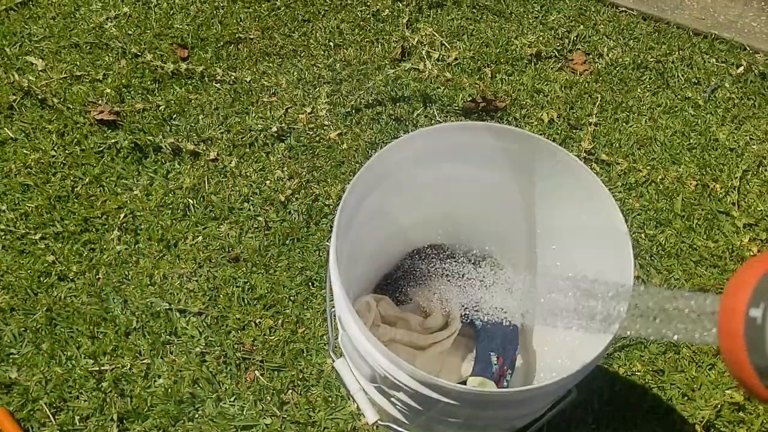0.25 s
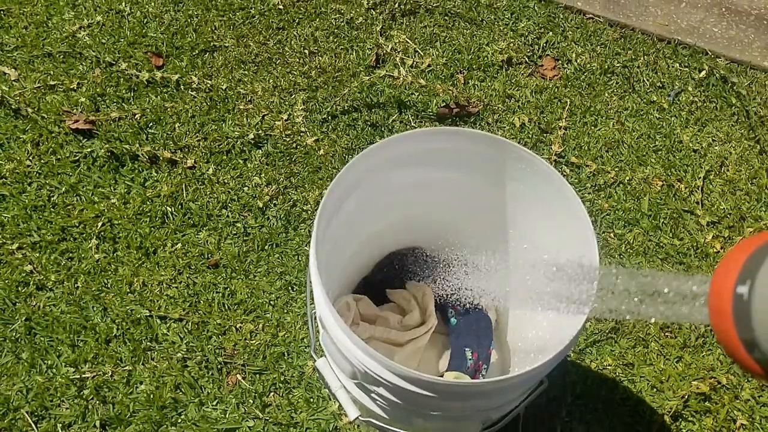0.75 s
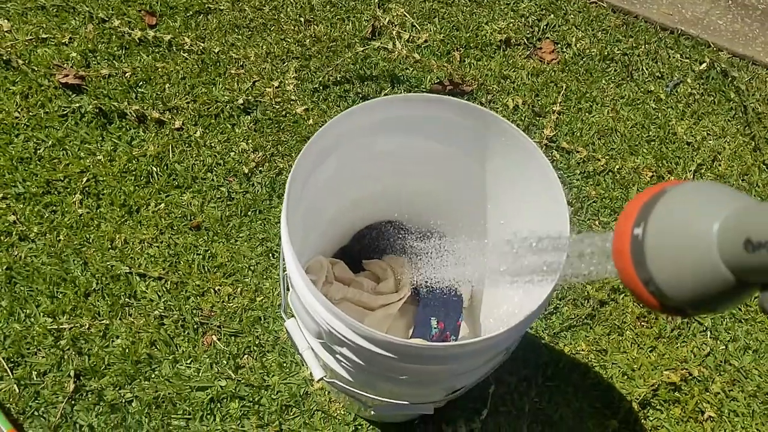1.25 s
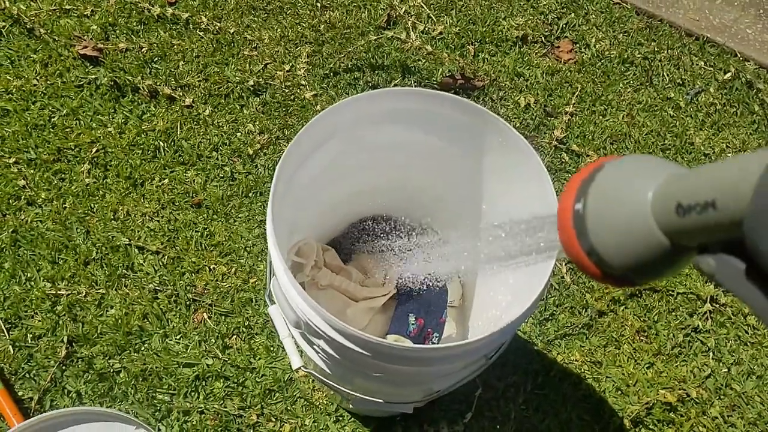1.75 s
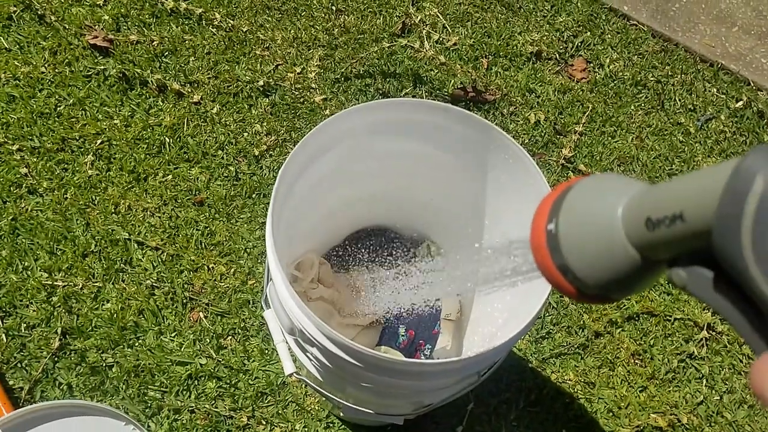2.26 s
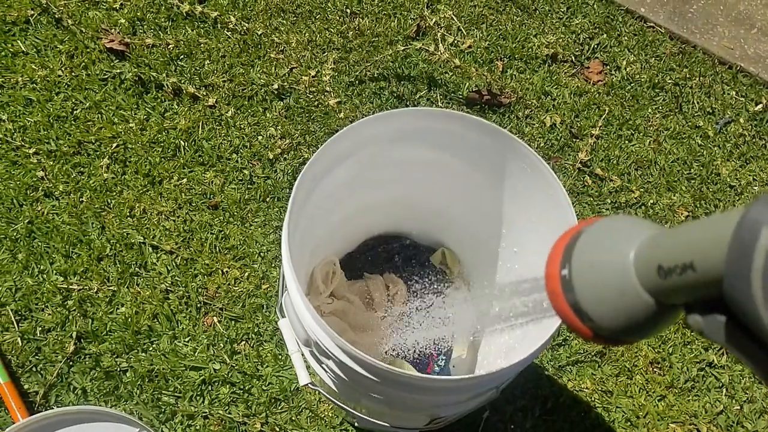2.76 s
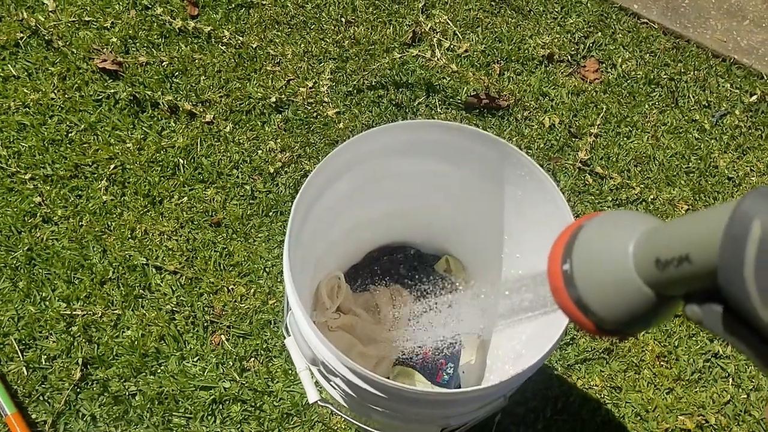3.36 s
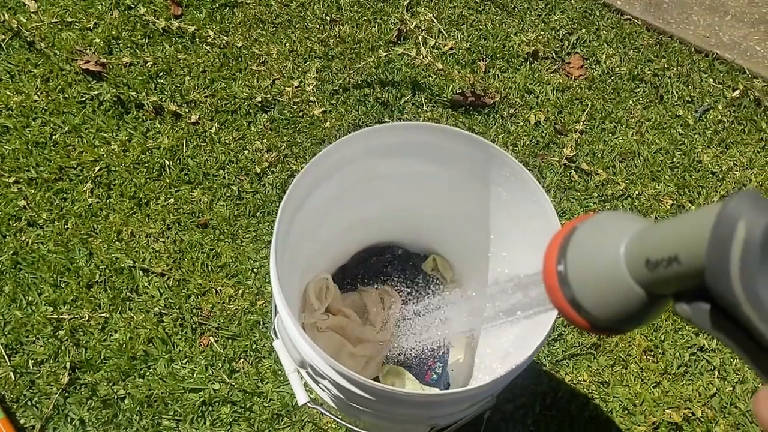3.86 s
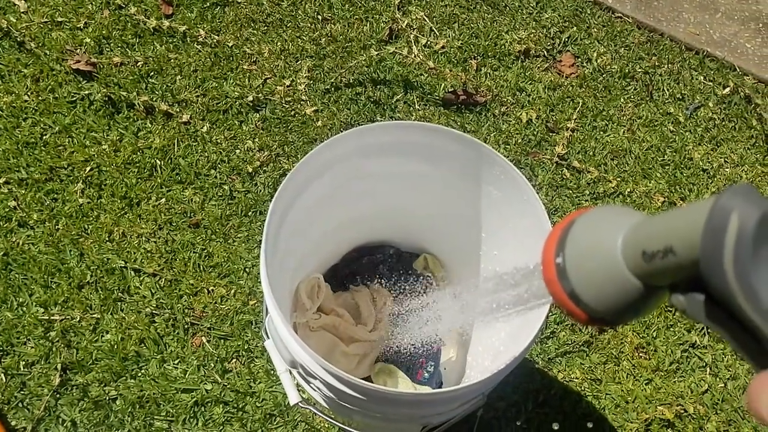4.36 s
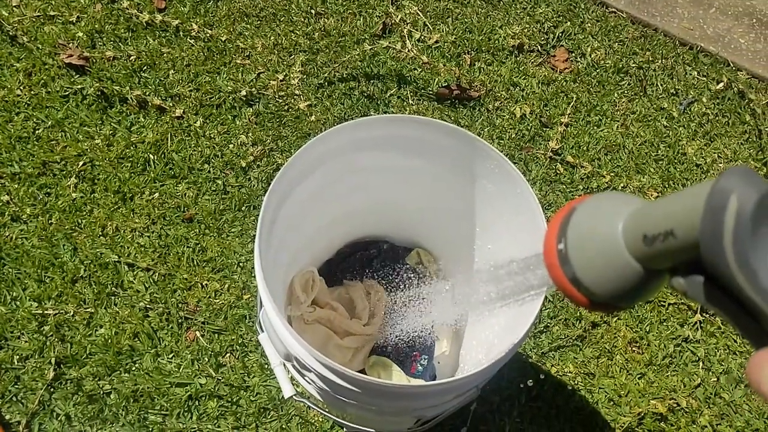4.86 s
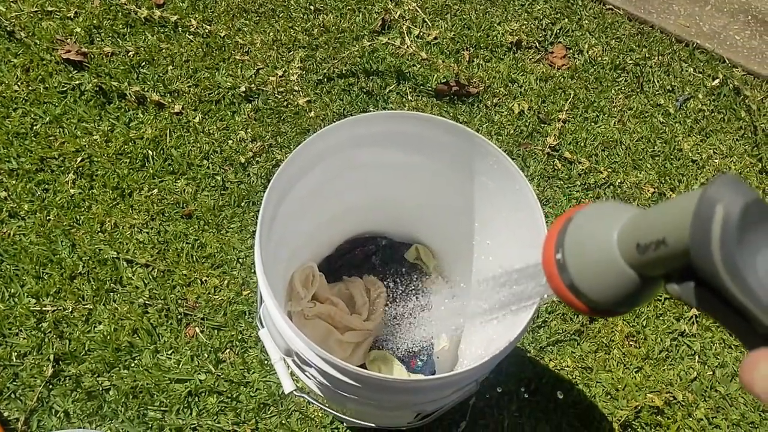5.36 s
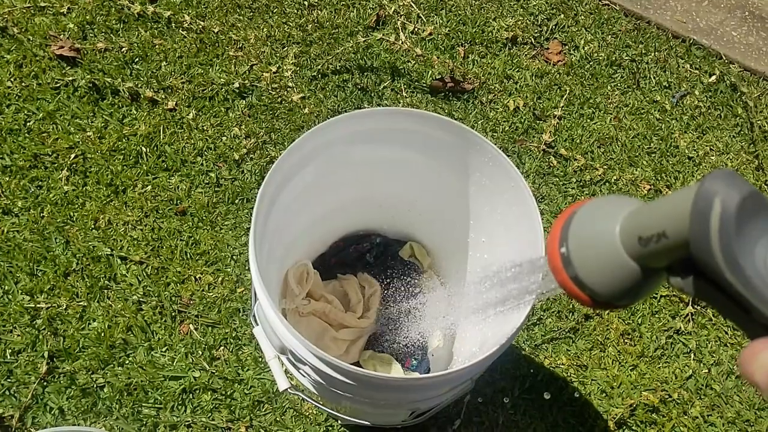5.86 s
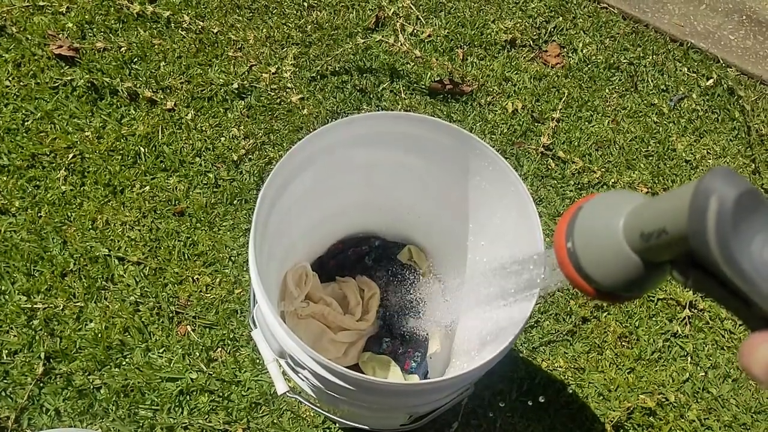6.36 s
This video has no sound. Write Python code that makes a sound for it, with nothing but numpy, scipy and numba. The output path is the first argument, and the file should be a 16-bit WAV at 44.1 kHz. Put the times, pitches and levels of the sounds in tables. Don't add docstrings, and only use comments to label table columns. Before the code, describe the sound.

Outdoors, close to a small stereo camera, a hose shower head sprays into a plastic bucket holding wet laundry. From 0 s the spray is thin and fluttering, dipping and pulsing as it is aimed, with hard bright clicks of big drops and low puffs of wind on the microphone. By about 1 s it swells into a dense, crisp hiss, strongest around 1.3 s, with splats on soaked cloth and a few small plops near 1.6 s. Underneath, the bucket drums and rings hollowly, its tone shifting as jets and water move. Around 2.3 s the spray weakens, then recovers and flows fairly steadily from 3 s, with scattered cracks and an odd plop. It strengthens again after 6 s, with more splats, and is still running at 6.6 s. The water leans right; a faint low engine drone swells near 1.7 s and gradually fades.

```python
import sys
import numpy as np
from scipy import signal
from scipy.fft import rfft, irfft, next_fast_len
from scipy.io import wavfile
from scipy.ndimage import uniform_filter1d, map_coordinates
from numba import njit

SR = 44100
rng = np.random.default_rng(int(sys.argv[2]) if len(sys.argv) > 2 else 0)


def nominal_scale(level):
    x = np.asarray(level, float) / 20
    return 10 ** x


def transcribe(signal):
    frames = np.atleast_2d(signal).T
    limited = np.clip(frames, -1, 1)
    pcm = np.round(limited * 32767).astype(np.int16)
    wavfile.write(sys.argv[1], SR, pcm)


N = 291942

# [t/s, right peak level/dB, f/Hz]
CRACKS = [(0.0153, -9.5, 7600), (0.1841, -5, 8500), (0.2005, -4, 7900), (0.2378, -7, 7600),
          (0.2866, -5, 8010), (0.4378, -3, 7640), (0.5627, -5, 7300), (0.6927, 0.5, 8350),
          (0.7234, -1, 7400), (0.9747, -1.2, 7600), (0.9867, 6, 7900), (1.0196, -3, 7600),
          (1.1425, 1, 7400), (1.1649, -0.6, 7600), (1.4017, 1.2, 7850), (1.5731, 1, 7800),
          (1.8711, -2.5, 8180), (1.8979, 2, 7550), (2.1001, 0, 8560), (2.5636, -1.5, 8500),
          (2.6076, -6, 8100), (2.9948, -1, 8080), (3.3454, -4.5, 8500), (4.4155, 2, 8500),
          (4.6141, -11, 7800), (4.7753, 2, 8450), (4.8544, 2, 8400), (5.7129, 3, 8440), (6.5859, -8, 8030),
          (6.6124, -3, 8300)]
# [t/s, right peak level/dB, f/Hz]
SPLATS = [(0.1578, -29, 2720), (0.4066, -20, 3300), (0.6042, -18, 2540), (0.6978, -22, 3370),
          (0.8398, -11, 3280), (0.9459, -8.5, 3320), (1.1426, -3.5, 2880), (1.2441, -3, 3340),
          (1.4132, -18, 3290), (1.6818, -5.5, 3760), (1.7476, -2.5, 3600), (1.8749, -7, 3660),
          (3.1486, -11, 3610), (6.1514, -6, 3730), (6.3968, -7, 3240), (6.5177, -13, 3530)]
# [t/s,
# right peak level/dB, f/Hz]
PLOPS = [(0.573, -26, 1880), (0.676, -31, 1620), (1.143, -22, 1900), (1.59, -26, 1810),
         (1.603, -23.5, 1850), (1.615, -25, 1750), (1.68, -24, 1760), (3.632, -24, 1670),
         (4.665, -28, 2040), (4.839, -34, 1840), (4.878, -28, 1950)]
# [f/Hz, right level/dB, left level/dB]
SPRAY_TONE = [(4765, -22.5, 0), (5330, -21.5, -10.5), (6074, -10.5, -3.5), (7420, -4.5, 0), (8100, -2.5, 3),
              (8500, 0.5, -4), (9070, -6, -9.5), (9460, -17, -11), (9630, -22.5, -31), (9665, -51.5, -47)]
# [f/Hz, right level/dB, left level/dB]
PATTER_TONE = [(1900, -22.5, -2), (2560, -8.5, -4), (3020, -5, -5), (3200, -2.5, -3.5), (4000, -3, -7),
               (4520, -8.5, 0.5), (4890, -10.5, -14), (4960, -16, -28.5), (5610, -19.5, -10.5)]
# [f/Hz, right level/dB, left level/dB]
BOOM_TONE = [(158, -11.5, -17.5), (224, -15.5, -4), (245, -4.5, 1.5), (417, -1.5, 5), (677, -1, 1),
             (1020, -22, -11.5), (1510, -13, 1.5), (2600, -10.5, -33)]
# [f/Hz, right level/dB, left level/dB]
BREEZE_TONE = [(12, -1, -25), (33, -7, -2.5), (69, 7.5, 3.5), (115, -4.5, -12), (166, -8, -10),
               (257, -28, -32.5)]
# [f/Hz, right level/dB, left level/dB]
HUM_TONE = [(22, -6, -5.5), (70, 3.5, -11), (143, 1, -5), (201, -10, -16), (274, -4.5, -10)]
SPOT_LAGS = [4.2, 2.86, 5.9, 4.27, 6.8, 7.05, 10.55]
RING_PAN_DB = (-5.5, -7, -3.5)
# [t/s, wall ring f/Hz, upper ring f/Hz, left lag/samples]
WATER_RINGS = [(0, 750, 1870, 1.8), (.7, 770, 1743, 0.77), (1.6, 844, 1847, 1.6), (2.6, 858, 1616, 0.27),
               (3.6, 847, 1640, 0.58), (4.1, 818, 1684, 1.14), (4.5, 840, 1816, 2.6), (5.3, 817, 1906, 3.4),
               (5.8, 828, 1900, 3.8), (6.62, 832, 1996, 4.8)]
# [t/s, f/Hz]
PATTER_RING = [(0.6, 3640), (0.9, 3450), (1.55, 3540), (1.81, 3750), (2.3, 3480), (3.3, 3420), (4.1, 3594),
               (5.3, 3490), (6.62, 3620)]
# [t/s, spray level/dB, part on the bare wall level/dB]
JETS = [(0.0, -34.5, -12), (.18, -32.5, -16), (.27, -36, -13), (.46, -30, -15), (.56, -34, -10.5),
        (.74, -28, -11), (.9, -27, -10), (1.31, -23.5, -7), (1.55, -26, -9), (1.85, -25, -10.5),
        (2.3, -33, -10), (2.55, -29, -11), (2.9, -29, -9), (3.25, -27, -11), (4.6, -26.5, -10.5),
        (5.05, -25, -12), (5.5, -26.5, -12), (6.3, -23.5, -11.5)]
# [t/s, floor drumming level/dB, then relative to it: far wall level/dB,
# wet cloth level/dB, plunge into the pool level/dB]
LANDING = [(0.0, -52, 5.5, 4.5, -0.5), (.2, -49.5, -1, -2, -3), (.6, -42, -2.5, -4.5, -7),
           (.94, -42.5, 6, 3.5, -4), (1.3, -41.5, -.5, -1.5, -.6), (1.85, -39.5, -3, -4.5, -4),
           (2.2, -45, -4, -2.5, -1.5), (2.65, -43.5, -2.5, 3, 4), (3.2, -45.5, -1, 3.5, 4),
           (3.52, -42, 1.5, 0, 2), (4.1, -42, -6, -3, 3.5), (4.7, -42.5, 0, 0.5, 0),
           (5.35, -42, -2.3, -0.7, 0.7), (5.9, -44, -3, -1.5, 3), (6.15, -44, .3, -1.5, 0.3),
           (6.4, -40.5, -3.5, -0.3, -0.5), (6.62, -39, -8, -0.5, -8)]
# [t/s, peak level/dB, length/s, left minus right level/dB]
GUSTS = [(0.0, -47, 0.099, 2), (.18, -48, 0.067, -21), (0.313, -57, 0.13, 16), (0.502, -46, .13, -10),
         (0.59, -54, 0.081, 12), (.83, -51, .06, 14), (.74, -50, 0.099, -22), (.88, -45.5, 0.072, -15),
         (1.13, -49.5, 0.16, -26), (1.66, -58, .2, 12), (2.2, -58, 0.18, 11), (3.03, -58, .07, 14),
         (3.36, -62, 0.11, -15), (4.06, -58, .07, 3), (4.3, -55, 0.11, 14), (4.45, -55, 0.25, -12),
         (4.74, -50.5, 0.066, -23), (4.832, -58, .1, 14), (5.05, -58, 0.075, -13), (5.362, -56, 0.13, 14),
         (5.673, -49, 0.095, 20), (5.82, -58, 0.071, 14), (5.88, -58, 0.19, -11), (6.03, -55, .12, 16),
         (6.2, -51.5, 0.23, -27), (6.32, -53, .08, -17)]
# [t/s, f/Hz, level/dB]
DRONE = [
    (0, 36.5, -80),
    (1.45, 36.3, -75),
    (1.7, 35.9, -56.5),
    (2.85, 34.1, -60),
    (3.4, 33, -63.5),
    (4.2, 33.2, -64),
    (4.7, 32.4, -70),
    (6.62, 32.5, -73),
]
SLIVERS = [1.5, 1.55, 2.11, 2.2, 2.25, 2.36, 2.47, 2.53, 2.62, 2.7, 2.84, 3.17, 3.26, 3.32, 3.431, 3.59,
           3.85, 4.11, 4.37, 4.48, 4.64, 4.85, 5.339, 5.388]


def columns(table):
    s, *rest = np.transpose(table)
    return [np.interp(np.arange(N) / SR, s, c) for c in rest]


def unit(x):
    return x / np.sqrt(np.mean(x ** 2, axis=-1, keepdims=True))


def colour(x, tone):
    size = next_fast_len(N)
    log_f = np.log(np.arange(size // 2 + 1) * SR / size + 1)
    hz, right_db, left_db = np.transpose(tone)
    gain = [nominal_scale(np.interp(log_f, np.log(hz), db, left=-90, right=-90)) for db in (left_db, right_db)]
    return irfft(rfft(x, size) * gain, size)[:, :N]


def place(db, pan_db):
    pair = nominal_scale(np.array([pan_db, -pan_db]) / 2)
    return nominal_scale(db) * pair / np.sqrt(np.mean(pair ** 2, axis=0))


def walk(rate):
    hold = int(SR / rate)
    steps = np.repeat(rng.standard_normal(N // hold + 1), hold)
    return uniform_filter1d(uniform_filter1d(steps, hold), hold)[:N]


@njit
def resonator(x, hz, width):
    y, band, low = np.empty(len(x)), 0., 0.
    for i in range(len(x)):
        g, damping = np.tan(np.pi * hz[i] / SR), width / hz[i]
        v = (band + g * (x[i] - low)) / (1 + g * (g + damping))
        band, low = 2 * v - band, low + 2 * g * v
        y[i] = damping * v
    return y


def ring(x, hz, width):
    return unit(np.array([resonator(resonator(side, hz, width), hz, width) for side in x]))


def rain(share, scatter_db, clump, stray, tint):
    size = next_fast_len(N)
    turn = -2j * np.pi * np.arange(size // 2 + 1) / size
    left = right = 0
    for k, lag in enumerate(SPOT_LAGS):
        hit = (rng.random(N) < share) * np.sign(rng.standard_normal(N))
        rank = np.minimum(rng.exponential(size=N), 5)
        spot = rfft(hit * nominal_scale(scatter_db * rank), size)
        ripple = np.cos(2 * np.pi * k / len(SPOT_LAGS) - 11.48 * turn.imag)
        spot *= np.sqrt(1 + min(tint, 1) * ripple)
        left, right = left + spot * np.exp(turn * lag), right + spot
    pair = unit(irfft(np.array([left, right]), size)[:, :N])
    pair[0] += stray * rng.standard_normal(N)
    return pair * clump


def spray():
    fine_db, wall_part_db = columns(JETS)
    wall_db = fine_db + wall_part_db
    fine_pan = -13 - 0.2 * (fine_db + 27.5)
    wall_pan = -4 - 1.1 * (wall_part_db + 11.0)
    surge = 0.32 * walk(11) + 0.18 * walk(45) + 0.77 * walk(160)
    fine_clump = nominal_scale(surge + 0.17 * walk(30) + 1.17 * walk(400))
    fine = colour(rain(.025, 3.14, fine_clump, stray=0.92, tint=0.72), SPRAY_TONE)
    on_wall = np.clip(0.041 * uniform_filter1d(wall_part_db + 11.0, SR // 4), -.4, .6)
    weight = np.std(fine, axis=1, keepdims=True) * ring(fine, np.full(N, 6700.), 1600.0)
    fine = fine + on_wall * weight
    wall_clump = nominal_scale(0.81 * surge + 0.35 * walk(20))
    wall = unit(colour(rain(.025, 3.2, wall_clump, stray=0.69, tint=0.43), PATTER_TONE))
    wall = wall + nominal_scale(-10.5) * ring(wall, columns(PATTER_RING)[0], 900.0)
    return unit(fine) * place(fine_db + 2.5, fine_pan) + unit(wall) * place(wall_db + 3.5, wall_pan)


def bucket():
    boom_db, hollow_db, cloth_db, plunge_db = columns(LANDING)
    wall_hz, upper_hz, _ = columns(WATER_RINGS)
    boom_pan, wall_pan, middle_pan = np.outer(RING_PAN_DB, np.ones(N))
    upper_pan = np.full(N, -6.5)
    slosh = nominal_scale(.5 * walk(4.4) + 1.1 * walk(11))
    drum = rain(.03, 1.6, slosh, stray=0.37, tint=0.12)
    other = [np.roll(drum, k * N // 4, axis=1) for k in range(4)]
    middle_hz = 1060 * (1 + 0.011 * walk(2.8))
    boom = unit(colour(drum, BOOM_TONE))
    wall = ring(other[1], wall_hz, 170.0)
    middle = ring(other[2], middle_hz, 430.0)
    upper = ring(other[3], upper_hz, 910.0) + nominal_scale(-14) * ring(other[3], upper_hz, 167)
    return (boom * place(boom_db + 0.67, boom_pan)
            + wall * place(boom_db + hollow_db - .6, wall_pan)
            + middle * place(boom_db + cloth_db + 0.15, middle_pan)
            + upper * place(boom_db + plunge_db + 2.0, upper_pan))


def breeze():
    t, calm = np.arange(N) / SR, np.zeros(N)
    power = place(calm - 70.5, calm) ** 2
    for s, peak_db, length, pan_db in GUSTS:
        swell = np.exp(-(2.5 * (t - s) / length) ** 2)
        power = power + place(peak_db, np.array([pan_db])) ** 2 * swell
    gusts = rng.standard_normal((2, N)) * nominal_scale(2.0 * np.array([walk(19), walk(23)]))
    hum = rng.standard_normal(N) + 0.1 * rng.standard_normal((2, N))
    wind = unit(colour(gusts, BREEZE_TONE)) * np.sqrt(power) * nominal_scale(6.0)
    return wind + nominal_scale(-59.0) * unit(colour(hum, HUM_TONE))


def drone():
    hz, db = columns(DRONE)
    return np.sqrt(2) * nominal_scale(db) * np.sin(2 * np.pi * np.cumsum(hz) / SR)


def single_drops(table, ms, pan_db, lag, trim_db):
    out = np.zeros((2, N + 600))
    n = np.arange(-200, 200)
    for s, right_db, hz in table:
        for ear, (late, db) in enumerate(((lag, right_db + pan_db), (0, right_db))):
            t = (n - late) / SR
            swell = np.exp(-4 * np.log(2) * (1000 * t / ms) ** 2)
            out[ear, int(s * SR) + 200 + n] += nominal_scale(db + trim_db) * swell * np.cos(2 * np.pi * hz * t)
    return out[:, 200:N + 200]


def big_drops():
    return (single_drops(CRACKS, ms=0.64, pan_db=-18, lag=7.5, trim_db=-3.5)
            + single_drops(SPLATS, ms=0.8, pan_db=-27, lag=7.5, trim_db=-5)
            + single_drops(PLOPS, ms=3.5, pan_db=-7.5, lag=6, trim_db=0))


def scene():
    water = spray()
    heard_at = np.arange(N) - columns(WATER_RINGS)[2]
    water[0] = map_coordinates(water[0], [heard_at], order=3, mode="nearest")
    return water + bucket() + breeze() + drone() + big_drops()


def top_cut(x):
    return signal.sosfilt(signal.butter(12, 10900, fs=SR, output="sos"), x)


def record(dry):
    low_pass = signal.ellip(12, .2, 90, 9650, fs=SR, output="sos")
    cut = signal.sosfilt(low_pass, np.tanh(dry))
    near = np.min(np.abs(np.arange(N) / SR - np.array(SLIVERS)[:, None]), axis=0)
    gate = np.sin(np.pi / 2 * np.clip(2.5 - near / 0.0086, 0, 1)) ** 2
    top_band = signal.ellip(6, 1, 80, (10250, 10850), "band", fs=SR, output="sos")
    hiss = unit(signal.sosfilt(top_band, rng.standard_normal(N)))
    cut[1] += nominal_scale(-54.5) * hiss * gate
    return top_cut(cut)


dry = scene()
out = record(dry)
transcribe(out)
```